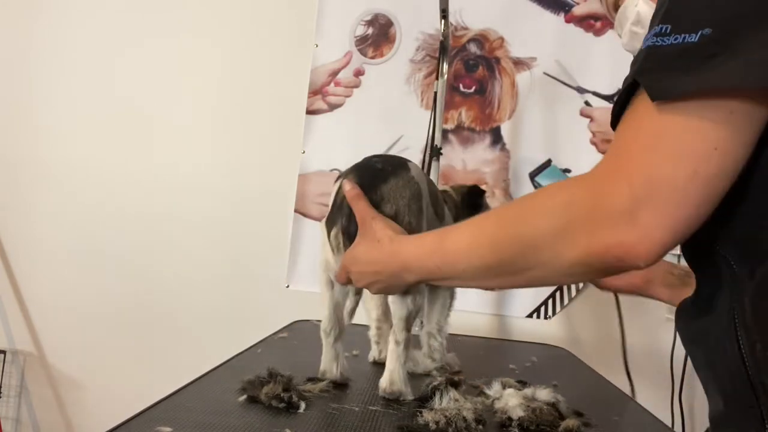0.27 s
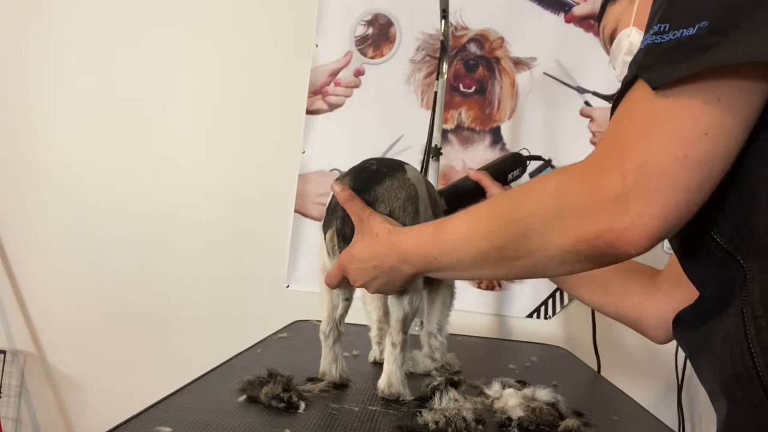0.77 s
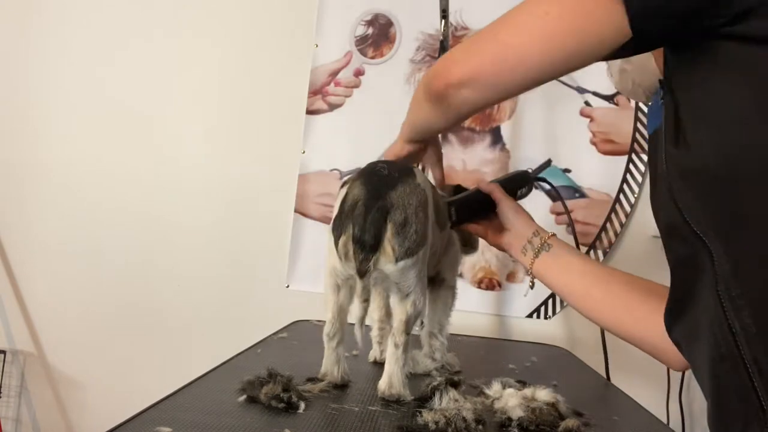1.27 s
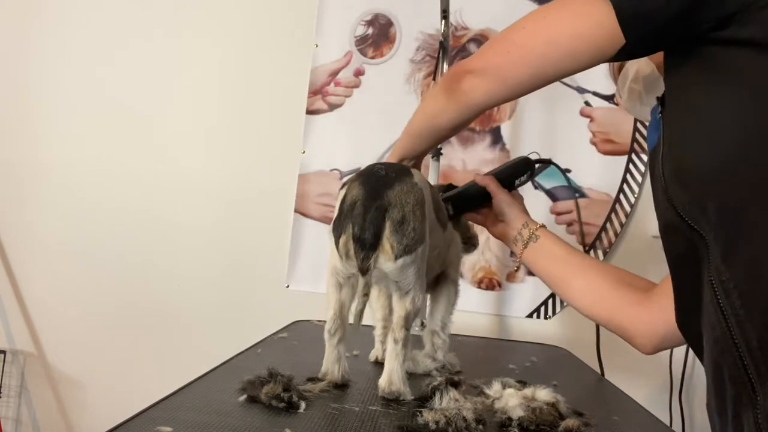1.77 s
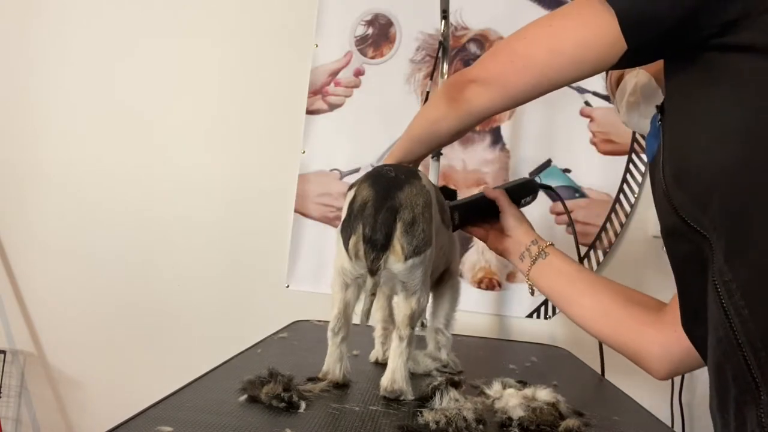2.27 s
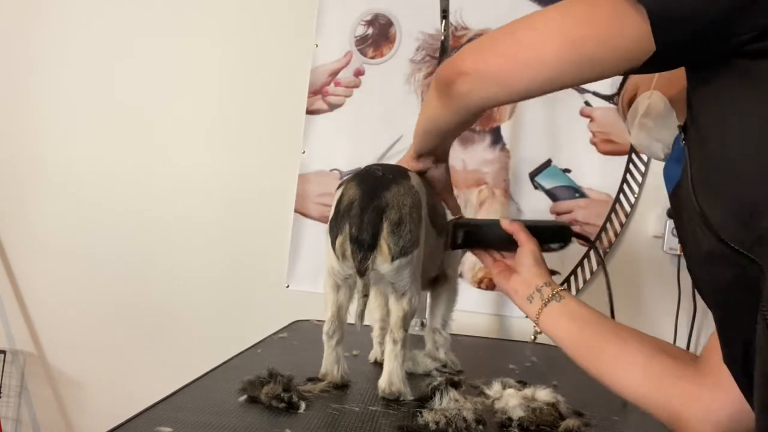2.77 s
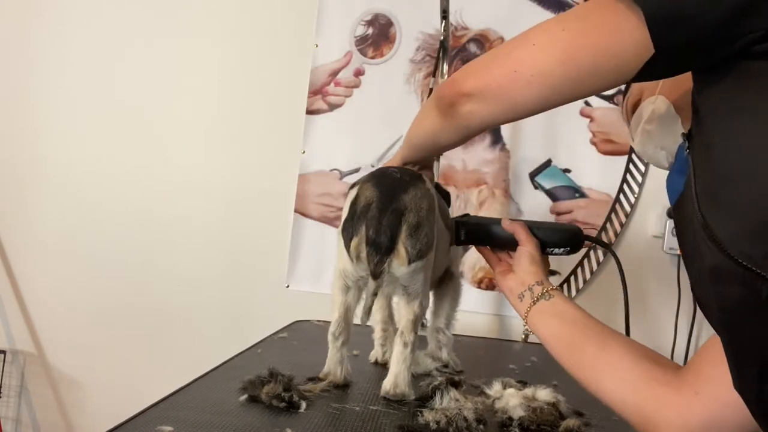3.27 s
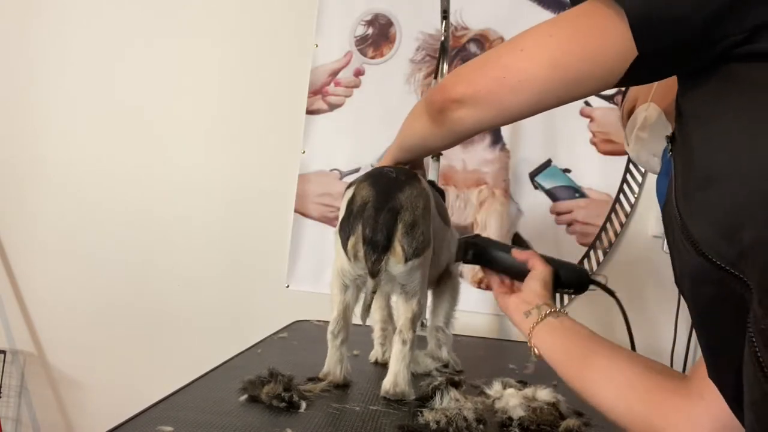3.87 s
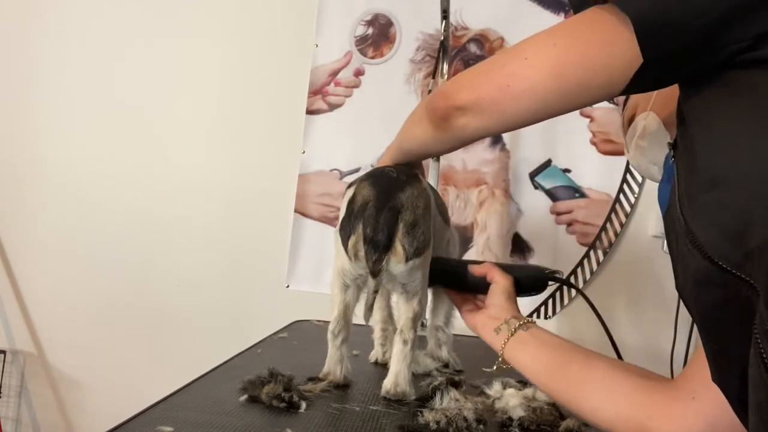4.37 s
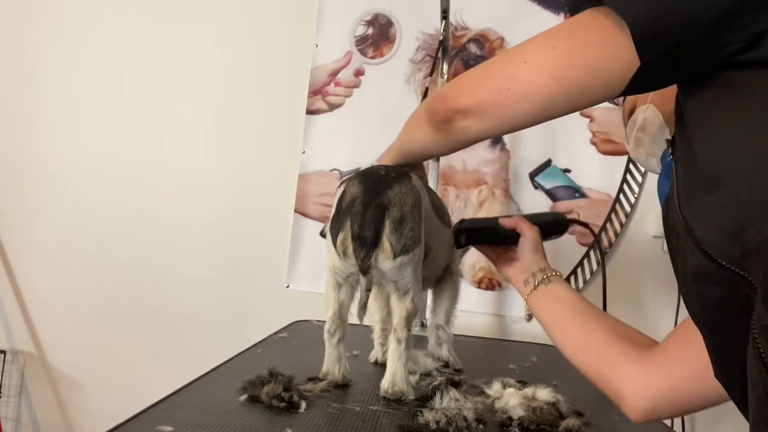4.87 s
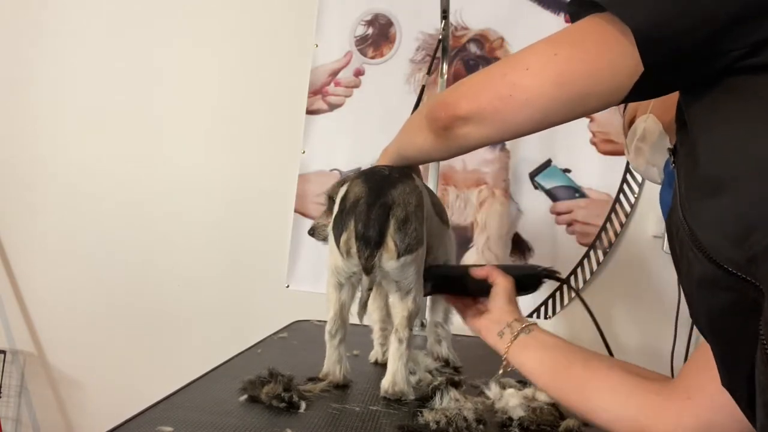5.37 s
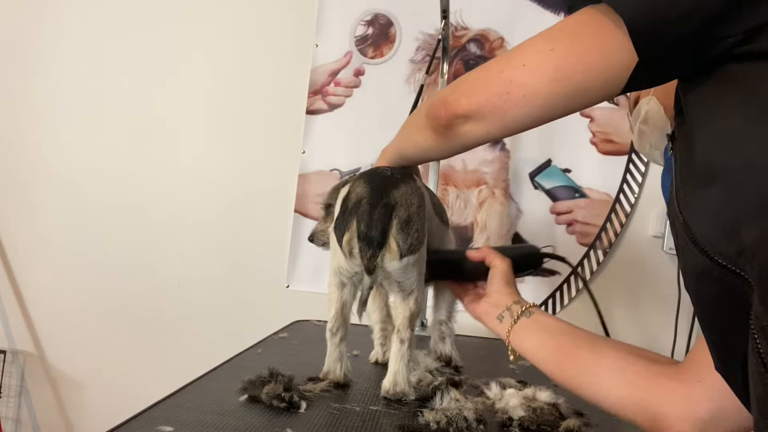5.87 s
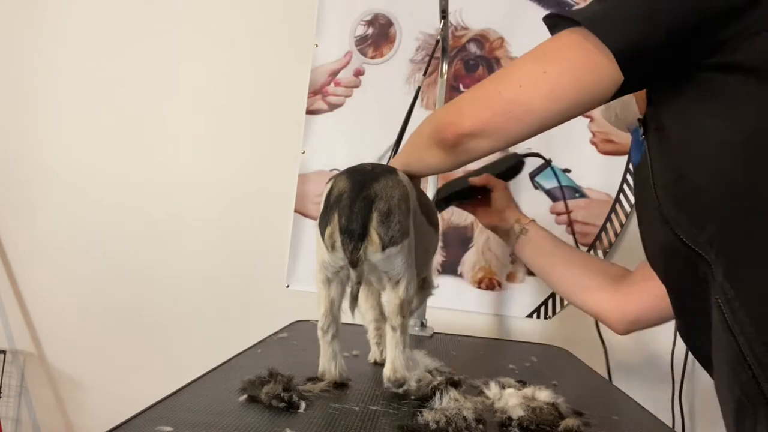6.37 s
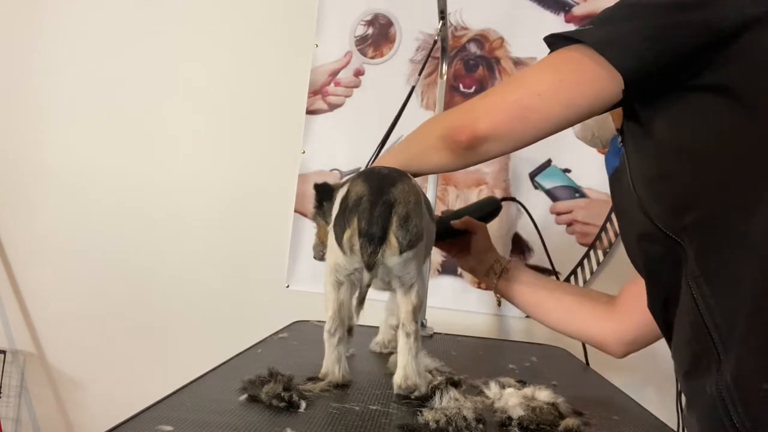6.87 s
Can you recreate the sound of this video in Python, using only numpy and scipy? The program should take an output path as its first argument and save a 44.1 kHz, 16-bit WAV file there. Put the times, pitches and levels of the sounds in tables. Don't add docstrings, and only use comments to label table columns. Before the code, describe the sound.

Corded clippers are already running at 0 s and continue to the end at about 7.1 s, with a nearly constant cam rate of about 49 strokes a second. The sound is a raspy, nasal buzz with many overtones, strongest around 1 to 2 kHz, plus steady bright hiss from the blade teeth. It thins slightly around 0.6 s, then returns and feels closer from about 3 s. The housing ring swells irregularly every 0.2 to 0.4 s, notably near 1.6, 2.9, 3.9, 5.4 and 6.6 s. Thin high squeals flicker at 0-2 s, slightly higher ones at 3.0 and 3.5 s, and faint ones near the end. A motor hum gains body between 3 and 6 s. Soft table thuds lie underneath, clearest at 4.3 s. Blade hiss lifts briefly near 6.1 s. The small hard room makes the wide stereo tone shimmer; it ends still buzzing.

```python
import sys
import numpy as np
from scipy import signal
from scipy.fft import irfft
from scipy.io import wavfile
from scipy.ndimage import uniform_filter1d, map_coordinates

SR = 44100
rng = np.random.default_rng(int(sys.argv[2]) if len(sys.argv) > 2 else 0)


def attenuation_scalar(level_db):
    decades = np.asarray(level_db, float) / 20
    return 10 ** decades


def waveform_to_disk(signal):
    frames = np.transpose(np.atleast_2d(signal))
    scaled = np.clip(frames, -1, 1) * 32767
    samples = np.round(scaled).astype(np.int16)
    wavfile.write(sys.argv[1], SR, samples)


N = 313992
TURN_POINTS = 1024

# (frequency [Hz], level [dB rms])
MAINS_HUM = [(180, -81)]
# (time [s], half length [s], deep level [dB], thud level [dB])
TABLE_BUMPS = [(0.057, 0.07, -71, -58.5), (0.44, 0.24, -74, -61.5), (0.676, 0.043, -72, -70),
               (.8, 0.094, -65, -61.5), (1.0, 0.073, -85, -63.5), (1.554, 0.071, -81, -72),
               (1.91, 0.22, -68.5, -65.5), (2.918, 0.081, -74, -68.5), (3.608, 0.16, -76, -68),
               (4.33, .09, -75, -48.5), (4.6, .1, -69, -66.5), (4.758, .06, -83, -64.5),
               (4.968, 0.068, -59, -62.5), (5.135, 0.066, -82, -56), (5.347, 0.23, -63.5, -65.5),
               (5.725, 0.2, -72, -61), (6.455, 0.12, -70, -76), (6.83, 0.054, -84, -58.5),
               (6.98, 0.063, -61, -61.5), (7.12, 0.035, -67, -57)]
# (time [s], speed [turns/s])
CAM_SPEED = [(0.0, 49.25), (0.3, 49.24), (0.59, 49.43), (0.89, 49.31), (1.6, 49.24), (2.08, 49.41),
             (2.37, 49.24), (2.67, 49.43), (3.4, 49.53), (3.95, 49.38), (4.6, 49.43), (5.04, 49.28),
             (5.34, 49.52), (5.64, 49.41), (6.23, 49.63), (6.53, 49.47), (6.82, 49.34), (7.12, 49.32)]
CONTACT_KNOCKS = [
    (.365, 1),
    (.595, .45),
    (.825, .5),
]
OWN_PARTIALS = (8, 15, 16, 22, 23, 37, 38, 39, 40)
# (level [dB rms], gain in the grip [dB], gain by the wrist turn [dB], side level [dB])
FRAME_LEVELS = [(-61.5, 1, 2, -70), (-66, 11, 0, -62), (-59.5, 5, 0, -68), (-55.5, 0, -8, -63),
                (-60, -2, 5, -65)]
# (pitch [Hz], resting level [dB])
TOOTH_ROWS = [(4300, -63), (5447, -90)]
# (time [s], half length [s], level [dB rms], row [index])
SQUEALS = [(.05, .08, -53, 0), (.25, .06, -52, 0), (.46, .05, -53, 0), (.64, .09, -48, 0),
           (1.02, .1, -52, 0), (1.45, .12, -53, 0), (1.75, .1, -53, 0), (3.0, .07, -51, 1),
           (3.47, .13, -50, 1), (3.87, .06, -55, 0), (6.72, .08, -57, 0), (7.08, .06, -55, 0)]
# (frequency [Hz], level [dB per Hz])
HISS_COLOUR = [(250, -26.5), (400, -7.5), (900, -12.5), (1900, -5), (2600, -5), (3400, -9.5), (4300, -2.5),
               (5400, 1.5), (6200, -6), (8000, -6), (9800, -13), (11500, -10), (14000, -14), (16000, -18)]
# (time [s], ring level [dB rms], resonance [Hz], odd partials against even [dB])
COAT_PASSES = [(0.16, -36.5, 1944, -19), (0.32, -45.5, 1960, 2), (0.49, -40, 1870, 5.5),
               (0.96, -42, 1916, 2.5), (1.15, -41.5, 1870, -2.5), (1.33, -41, 1860, -15),
               (1.56, -36.5, 1914, -31), (1.85, -37, 1920, -20), (2.05, -40.5, 1927, -6),
               (2.3, -38.0, 1964, -15), (2.5, -37, 1932, -13), (2.7, -42, 1860, -2), (2.9, -36, 1913, -9.5),
               (3.31, -40, 1880, -8), (3.47, -36.5, 1900, -6), (3.63, -39.5, 1964, 3),
               (3.852, -33.5, 1924, -14), (4.22, -35, 1890, -4), (4.5, -36, 1910, 3.5),
               (4.74, -38, 1928, -11), (4.99, -41, 1914, -6), (5.19, -37.5, 1890, 0),
               (5.37, -32.5, 1886, -2), (5.62, -39.5, 1940, 2), (5.95, -36.5, 1915, -4.5),
               (6.2, -40, 1950, -13), (6.38, -35.5, 1914, -6), (6.58, -34, 1920, 3), (6.96, -35, 1922, -1),
               (7.1, -39.5, 1910, -1)]
# (time [s], half length [s], side level [dB])
HOUSING_TILTS = [(0.557, 0.18, -35), (2.838, .1, -34), (3.196, 0.17, -35), (4.043, 0.086, -35.5),
                 (4.684, 0.074, -34.5), (5.046, .15, -30), (5.36, 0.073, -33), (5.695, 0.12, -36),
                 (5.974, .06, -34), (6.165, 0.079, -35.5), (6.504, 0.16, -35.5), (6.923, 0.18, -31)]
# (time [s], nearness as knock level [dB], blade pressure as hiss level [dB], # blade angle as level
# of the knock's flank, 1320 to 1810 Hz [dB])
HAND_MOVES = [(0.0, -45, -41, -2.5), (0.04, -49, -41.5, 2), (0.65, -53, -41, 5), (0.79, -49.5, -41.5, 3),
              (1.53, -47.5, -40, 1.5), (2.42, -49, -40, 5.5), (2.56, -47.5, -39, -2.5), (2.91, -46, -39, 7),
              (3.17, -44.5, -39.5, -2.5), (3.59, -44.5, -39.5, 0), (3.77, -45, -39.5, -3.5),
              (5.67, -46, -39, 3), (5.97, -44, -40, -1), (6.07, -45.5, -37.5, 7), (6.21, -46, -38.5, 3.5),
              (6.41, -46, -41, 10.5), (6.76, -45, -40, -2.5), (7.12, -44, -39.5, 4.5)]
# (frequency [Hz], level [dB])
KNOCK_COLOUR = [(180, -61), (300, -23), (638, -18.5), (801, -15.5), (937, -17.5), (1080, -14), (1360, -16),
                (1650, -10.5), (1910, -8.5), (2230, -10), (3230, -16), (4230, -12), (9000, -26.5),
                (11700, -47), (19800, -120)]
# (frequency [Hz], width [Hz], gain [dB])
HOUSING_PEAKS = [(585, 240, 5), (1168, 27, 9.5), (1832, 500, 6.5), (2870, 160, 4), (5470, 380, 7.5)]
# (frequency [Hz], lead [radians])
PORT_LEAD = [(200, 0), (600, -1.1), (1500, -1.4), (3000, -2.1), (4400, -3.8), (5700, -3.3), (6300, -.6),
             (7900, 0), (9000, .9), (10300, 3.1), (11500, 4.3), (13000, 6.3), (14200, 7.6), (15400, 9.4)]
# (frequency [Hz], share [0 to 1])
PORT_LIKENESS = [(200, 0.94), (700, 0.33), (2000, 0.37), (4500, 0.48), (6000, 0.49), (7500, 0.69),
                 (10000, 1), (15000, 1)]
# (frequency [Hz], difference [dB])
PORT_BALANCE = [(100, 6), (300, 1.5), (680, -3), (1900, -0.5), (5500, -1.2), (7800, 0)]

RING_REST_DB, PASS_FALL_S, PASS_RISE = -53, .095, 1.35


def in_time(rows):
    s, *columns = np.transpose(rows)
    return [np.interp(np.arange(N) / SR, s, column) for column in columns]


def at_hz(points, hz):
    points = np.maximum(np.array(points, float), [1, -np.inf])
    return np.interp(np.log(np.maximum(hz, 1)), np.log(points[:, 0]), points[:, 1])


def rms_one(x):
    return x / np.sqrt(np.mean(np.abs(x) ** 2) + 1e-20)


def wander(shape, rate_hz, step_hz):
    r = np.exp(-2 * np.pi * rate_hz / step_hz)
    white = rng.standard_normal(shape[:-1] + (shape[-1] + 200,))
    smooth = signal.lfilter([1], [1, -2 * r, r * r], white)
    return rms_one(smooth[..., 200:])


def swells(times, lengths, powers, rest=0, rise=1):
    t = np.arange(0, N + 256, 256) / SR
    late = (t - times[:, None]) / lengths[:, None]
    bells = np.exp(-np.where(late < 0, late / rise, late) ** 2)
    total = powers @ bells + rest
    return np.interp(np.arange(N) / SR, t, 10 * np.log10(total + 1e-12))


def pass_swells(powers):
    s = np.transpose(COAT_PASSES)[0]
    return swells(s, PASS_FALL_S + 0 * s, powers, attenuation_scalar(2 * RING_REST_DB), PASS_RISE)


def step_at(s):
    shift_s = .2
    return .5 + .5 * np.tanh((np.arange(N) / SR - s) / shift_s)


def ports(direct, diffuse, hz):
    alike = np.clip(at_hz(PORT_LIKENESS, hz), 0, 1)
    side = np.array([.5, -.5]).reshape((2,) + (1,) * direct.ndim)
    lead = np.exp(1j * side * at_hz(PORT_LEAD, hz))
    balance = attenuation_scalar(side * at_hz(PORT_BALANCE, hz))
    return balance * (np.sqrt(alike) * lead * direct + np.sqrt(1 - alike) * diffuse)


def line(cycles, mid_db, side_db, slip=1.06, slip_hz=1.63, fade_db=7.5):
    slow = wander((3, N // 256 + 2), slip_hz, SR / 256)
    mid_slip, side_slip, fade = [np.interp(np.arange(N) / 256, np.arange(len(s)), s) for s in slow]
    mid = attenuation_scalar(mid_db) * np.sqrt(2) * np.cos(2 * np.pi * cycles + slip * mid_slip)
    side = attenuation_scalar(side_db + fade_db * fade) * np.cos(2 * np.pi * cycles + slip * side_slip)
    return mid + side * [[1], [-1]]


def strike(order):
    return sum(size * np.exp(-2j * np.pi * order * at) for at, size in CONTACT_KNOCKS)


def table_rumble():
    s, length, deep_db, thud_db = np.transpose(TABLE_BUMPS)
    deep = swells(s, length, attenuation_scalar(2 * deep_db), attenuation_scalar(2 * -79.5))
    thud = swells(s, length, attenuation_scalar(2 * thud_db), attenuation_scalar(2 * -74.5))
    side_db = -9.0
    out = 0
    for db, low_hz, high_hz in ((deep - 0.5, 48, 74), (thud, 108, 270)):
        sos = signal.butter(2, [low_hz, high_hz], "band", fs=SR, output="sos")
        noise = signal.sosfilt(sos, rng.standard_normal((2, N + SR)))
        mid, side = rms_one(noise[:, SR:])
        out = out + attenuation_scalar(db) * (mid + attenuation_scalar(side_db) * side * [[1], [-1]])
    t = np.arange(N) / SR
    return out + sum(attenuation_scalar(db) * np.sqrt(2) * np.sin(2 * np.pi * hz * t) for hz, db in MAINS_HUM)


def frame_hum(turns, grip, turned):
    fades = wander((len(FRAME_LEVELS), N // 256 + 2), 1.0, SR / 256)
    out = 0
    for k, (db, grip_db, turn_db, side_db), fade in zip(OWN_PARTIALS, FRAME_LEVELS, fades):
        fade_db = 1.5 * np.repeat(fade, 256)[:N]
        level_db = db + grip_db * grip + turn_db * turned + fade_db
        cycles = k * turns + np.angle(strike(k)) / (2 * np.pi)
        out = out + line(cycles, level_db, side_db, slip=.35)
    return out


def tooth_squeal():
    s, length, db, row = np.transpose(SQUEALS)
    out = 0
    for k, (pitch_hz, rest_db) in enumerate(TOOTH_ROWS):
        mine = row == k
        level_db = swells(s[mine], length[mine], attenuation_scalar(2 * db[mine]), attenuation_scalar(2 * rest_db))
        cycles = np.cumsum(pitch_hz + 2.5 * np.maximum(level_db + 55, 0)) / SR
        out = out + line(cycles, level_db, level_db - 3, slip=.6, slip_hz=8, fade_db=4)
    return out


def blade_hiss(turns, hiss_db):
    stroke, uneven, fall = 1.0, 0.3, .35
    patchy_db, patch_hz, shared_db, grain_db = 3.0, 200.0, 0.61, 2.5
    swell = uniform_filter1d(np.exp(-(2 * turns % 1) / fall), size=110)
    gate = 1 + stroke * swell * (1 + uneven * np.sign(.5 - turns % 1))
    grit = rng.standard_normal((3, N)) * gate * attenuation_scalar(grain_db * rng.standard_normal(N))
    hz, s, spectra = signal.stft(grit, SR, nperseg=1024)
    column = hz[:, None]
    patches = wander((2, len(hz), len(s)), 2.6, SR / 512)
    width = max(1, int(patch_hz / hz[1]))
    patches = uniform_filter1d(patches, width, axis=1)
    patches = rms_one(uniform_filter1d(patches, width, axis=1))
    shared = wander(s.shape, 16.0, SR / 512)
    colour_db = at_hz(HISS_COLOUR, column) + patchy_db * patches + shared_db * shared
    coloured = attenuation_scalar(colour_db) * ports(spectra[0], spectra[1:], column) * (column > 200)
    out = signal.istft(coloured, SR)[1][:, :N]
    core_band = signal.butter(4, [3500, 9000], "band", fs=SR, output="sos")
    core = signal.sosfilt(core_band, out.mean(axis=0))
    return attenuation_scalar(hiss_db) * out / np.std(core)


def housing_ring(turns, speed_hz):
    s, db, centre_hz, odd_db = np.transpose(COAT_PASSES)
    orders = OWN_PARTIALS[5:]
    order = np.array(orders)[:, None]
    width_hz, flutter_db, rest_side_db = 70, 1.6, -40.5
    shape = np.exp(-((order * speed_hz - centre_hz) / width_hz) ** 2) * attenuation_scalar(odd_db * (order % 2))
    powers = attenuation_scalar(2 * db) * shape ** 2 / np.sum(shape ** 2, axis=0)
    flutter = wander((len(order), N // 64 + 1), 6.0, SR / 64)
    flutter = flutter_db * np.repeat(flutter, 64, axis=1)[:, :N]
    at, length, tilt_db = np.transpose(HOUSING_TILTS)
    side_db = swells(at, length, attenuation_scalar(2 * tilt_db), attenuation_scalar(2 * rest_side_db))
    side_shares_db = (-12.0, 0.0, -7.0, -4.0)
    out = 0
    for k, power, f, share_db in zip(orders, powers, flutter, side_shares_db):
        out = out + line(k * turns, pass_swells(power) + f, side_db + share_db, slip=1.4, fade_db=2.5)
    return out


def play_turns(partials, turns):
    waves = irfft(partials, TURN_POINTS) * TURN_POINTS / np.sqrt(2)
    waves = np.concatenate([waves, waves[..., :1]], axis=-1)
    where = [turns, (turns % 1) * TURN_POINTS]
    return np.array([map_coordinates(w, where, order=1, mode="nearest") for w in waves])


def blade_knocks(turns, speed_hz, knock_db, flank_db, clatter_db):
    steady_hz, fade_hz = 1820.0, 1.47
    count, order = int(turns[-1]) + 2, np.arange(TURN_POINTS // 2 + 1)
    hz = order * speed_hz
    silent = (hz < 320) | (hz > 9000) | np.isin(order, OWN_PARTIALS)
    level_db = at_hz(KNOCK_COLOUR, hz) - 200 * silent
    level_db = level_db + sum(db / (1 + (2 * (hz - f) / w) ** 2) for f, w, db in HOUSING_PEAKS)
    for db, low_hz, high_hz in ((flank_db, 1320, 1810), (clatter_db, 2100, 3300)):
        each_turn = np.interp(np.arange(count), turns, db - db.mean())
        level_db = level_db + 1.4 * each_turn[:, None] * ((hz > low_hz) & (hz < high_hz))
    fades = wander((3, 2, len(order), count), fade_hz, speed_hz)
    fades = np.swapaxes(fades[:, 0] + 1j * fades[:, 1], 1, 2) / np.sqrt(2)
    steady = np.exp(-(hz / steady_hz) ** 2)
    contact = strike(order) / np.sqrt(np.abs(strike(order)))
    direct = steady + np.sqrt(1 - steady ** 2) * fades[0]
    partials = attenuation_scalar(level_db) * contact * ports(direct, fades[1:], hz)
    low_part = partials.mean(axis=0)[:, hz < 1300]
    low_rms = np.sqrt(np.mean(np.sum(np.abs(low_part) ** 2, axis=1)))
    return attenuation_scalar(knock_db) * play_turns(partials / low_rms, turns)


def scene():
    speed_hz, = in_time(CAM_SPEED)
    knock_db, hiss_db, angle_db = in_time(HAND_MOVES)
    grip = step_at(2.88) - step_at(6.02)
    turned = step_at(3.5)
    ring_db = pass_swells(attenuation_scalar(2 * np.transpose(COAT_PASSES)[1]))
    flank_db = 0.53 * angle_db + .15 * ring_db
    clatter_db = 0.98 * (hiss_db - knock_db) - 1 * turned
    turns = np.cumsum(speed_hz) / SR
    mean_hz = speed_hz.mean()
    background = table_rumble() + frame_hum(turns, grip, turned)
    blade = tooth_squeal() + blade_hiss(turns - .27, hiss_db - .6)
    buzz = housing_ring(turns, mean_hz) + blade_knocks(turns, mean_hz, knock_db - 4.0, flank_db, clatter_db)
    return background + blade + buzz


def low_pass(x):
    return signal.sosfilt(signal.butter(12, 15870, fs=SR, output="sos"), x)


def record(dry):
    return low_pass(dry)


dry = scene()
out = record(dry)
waveform_to_disk(out)
```